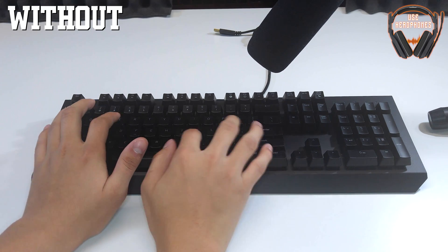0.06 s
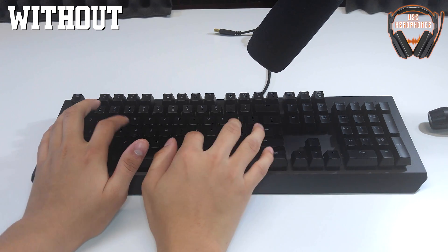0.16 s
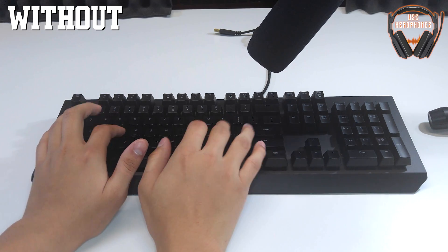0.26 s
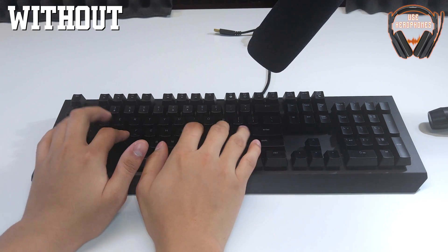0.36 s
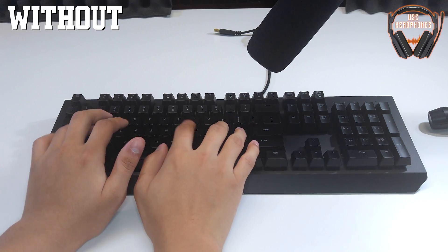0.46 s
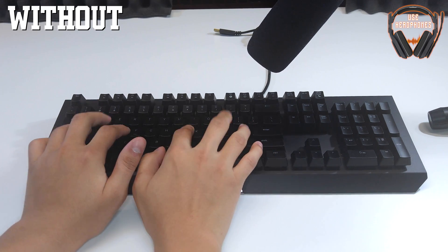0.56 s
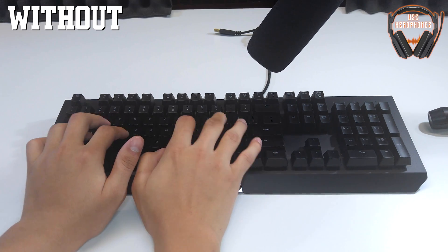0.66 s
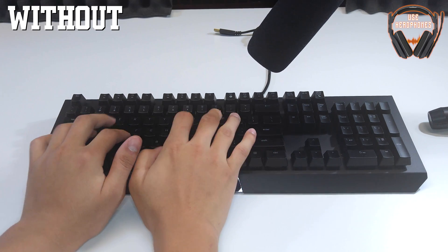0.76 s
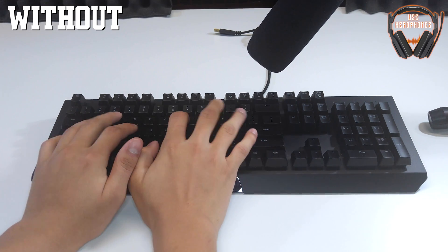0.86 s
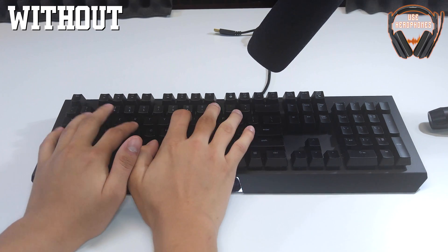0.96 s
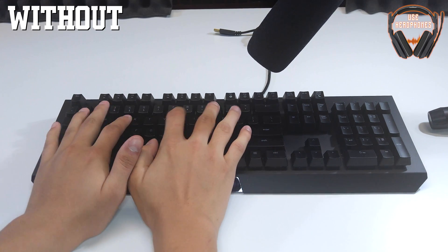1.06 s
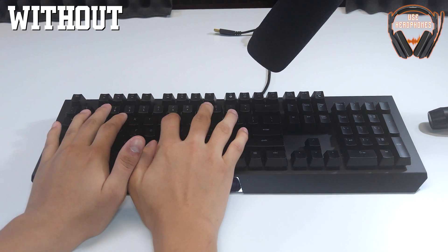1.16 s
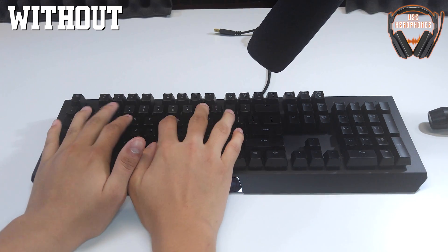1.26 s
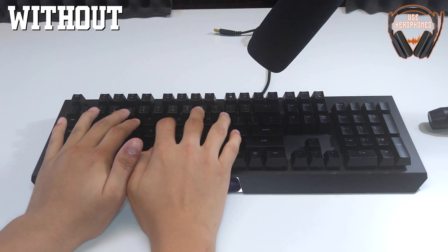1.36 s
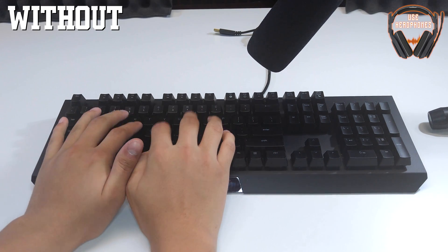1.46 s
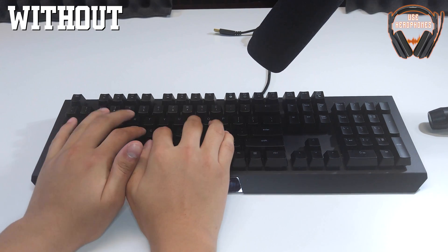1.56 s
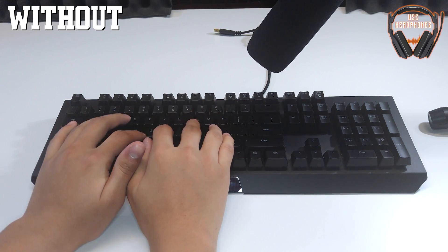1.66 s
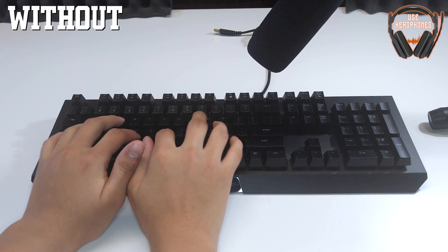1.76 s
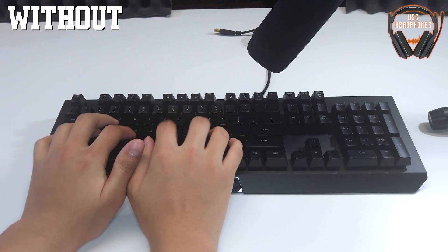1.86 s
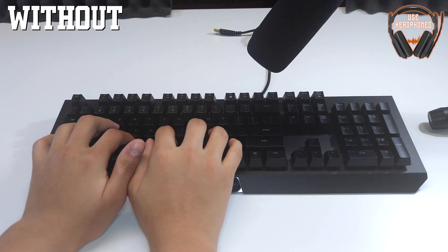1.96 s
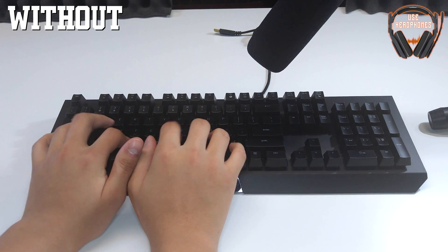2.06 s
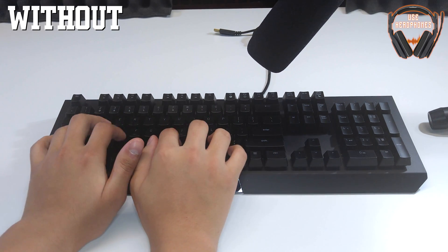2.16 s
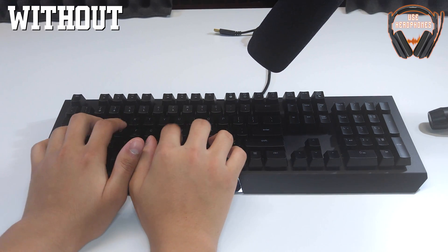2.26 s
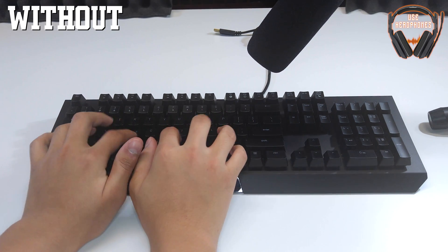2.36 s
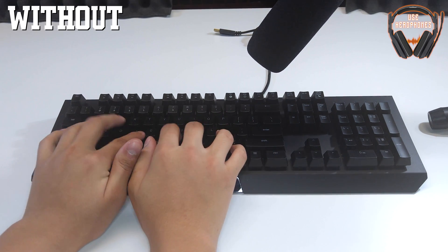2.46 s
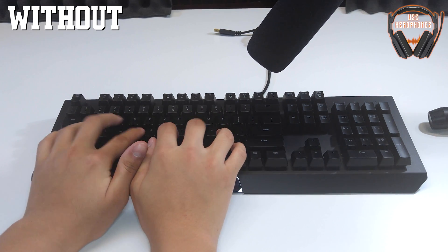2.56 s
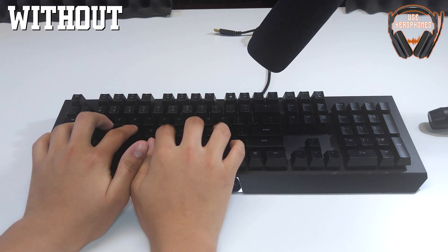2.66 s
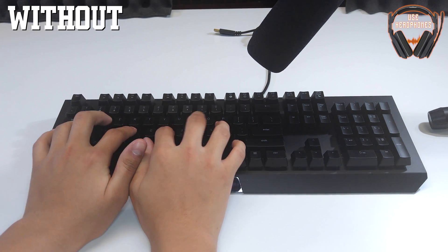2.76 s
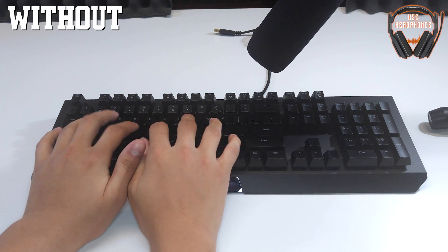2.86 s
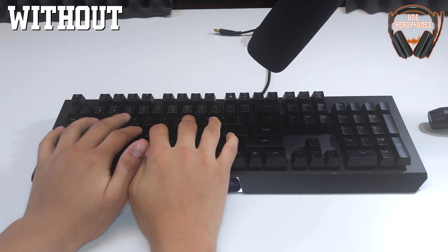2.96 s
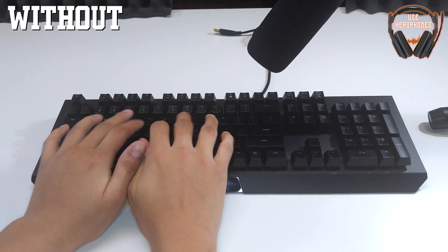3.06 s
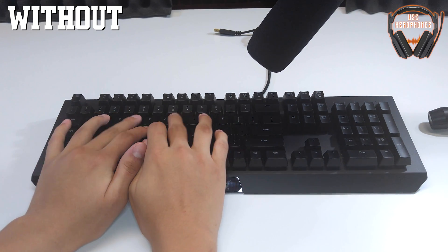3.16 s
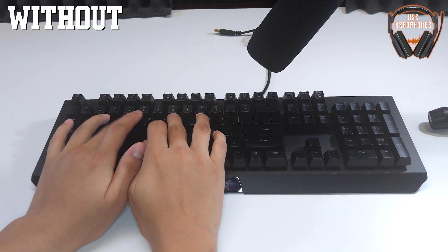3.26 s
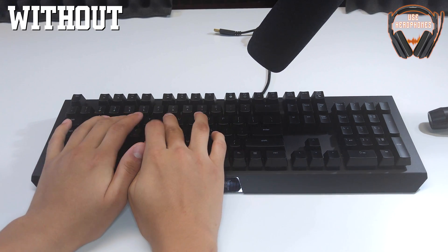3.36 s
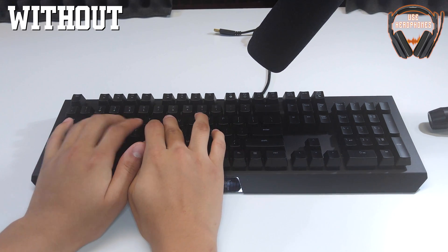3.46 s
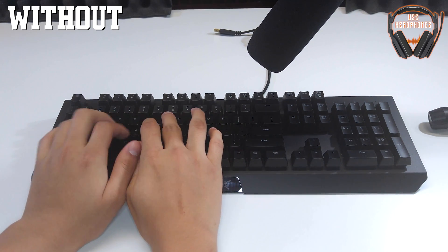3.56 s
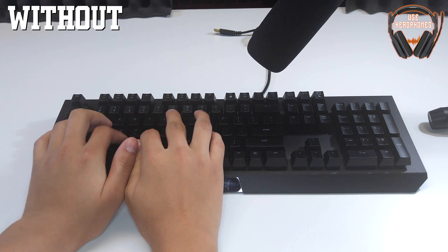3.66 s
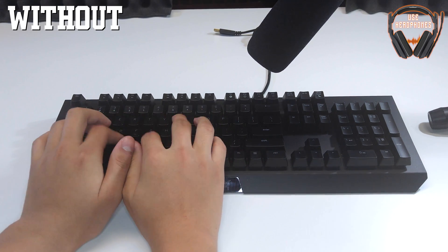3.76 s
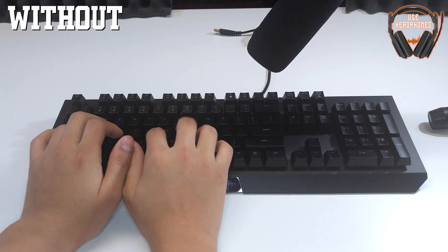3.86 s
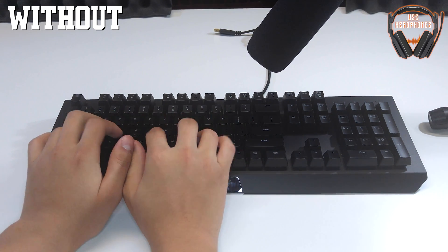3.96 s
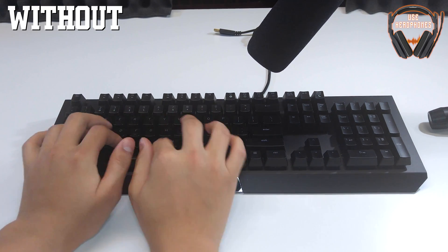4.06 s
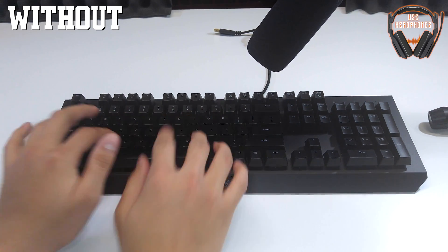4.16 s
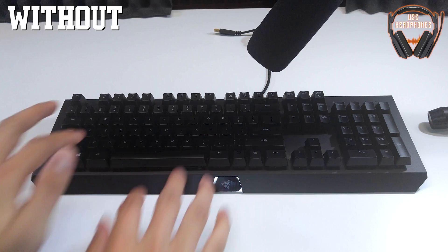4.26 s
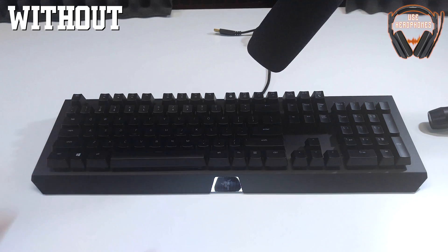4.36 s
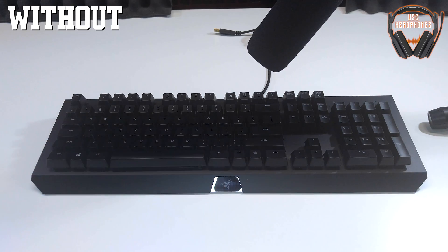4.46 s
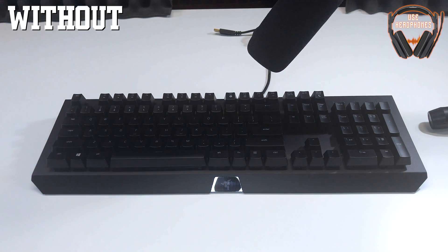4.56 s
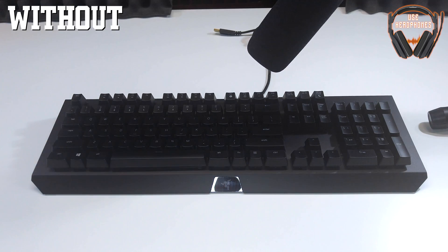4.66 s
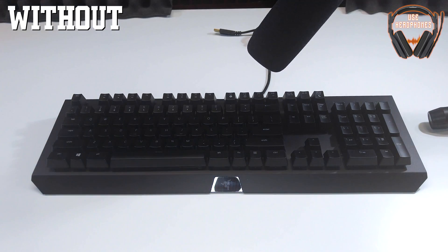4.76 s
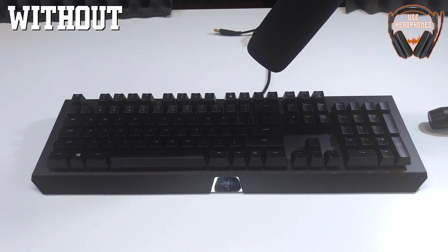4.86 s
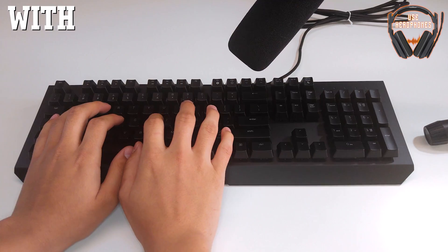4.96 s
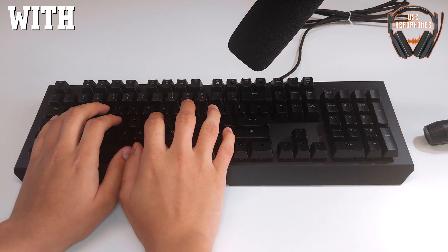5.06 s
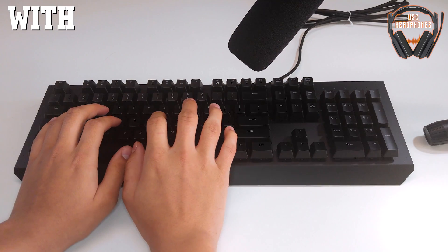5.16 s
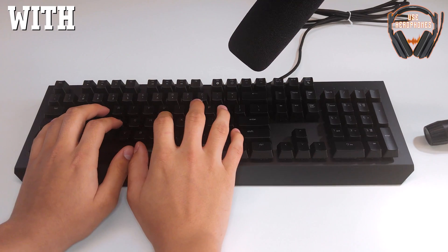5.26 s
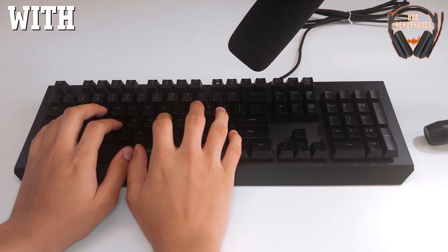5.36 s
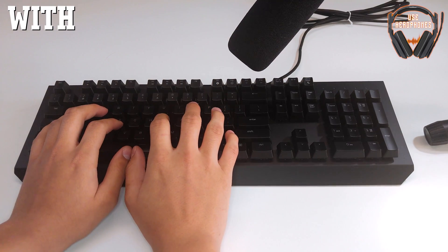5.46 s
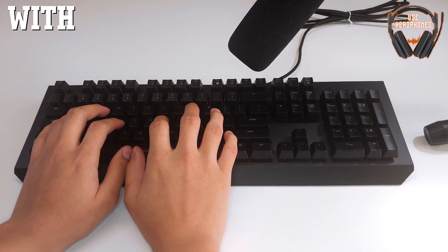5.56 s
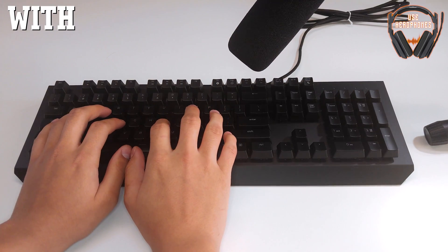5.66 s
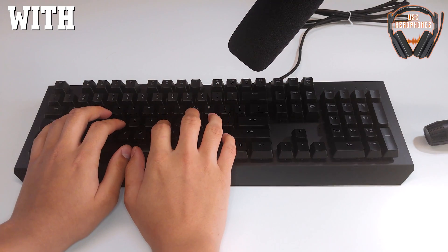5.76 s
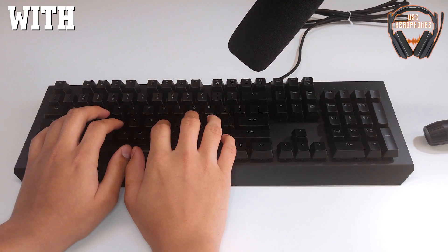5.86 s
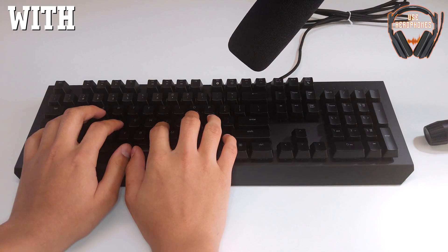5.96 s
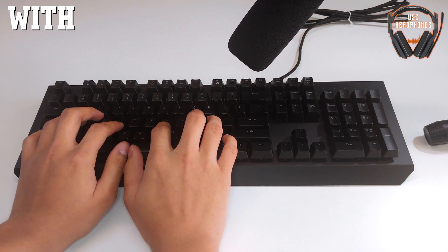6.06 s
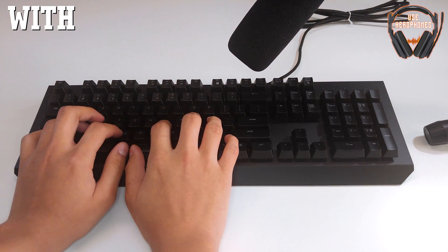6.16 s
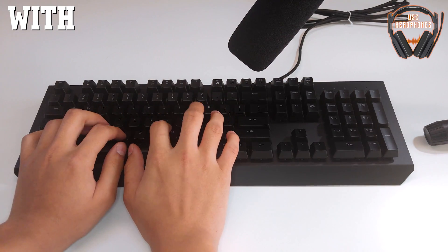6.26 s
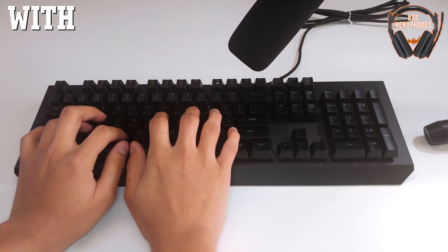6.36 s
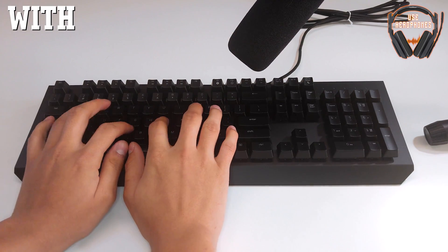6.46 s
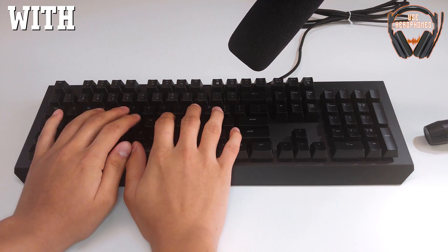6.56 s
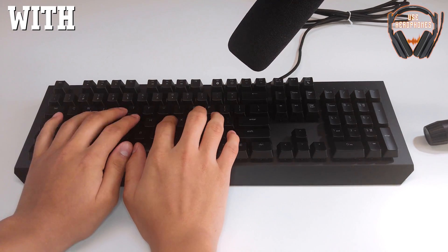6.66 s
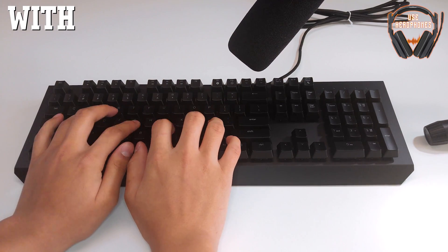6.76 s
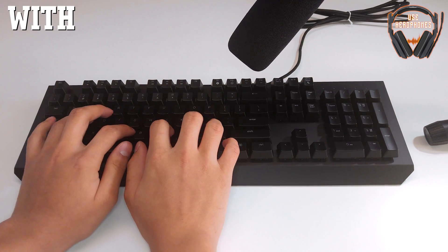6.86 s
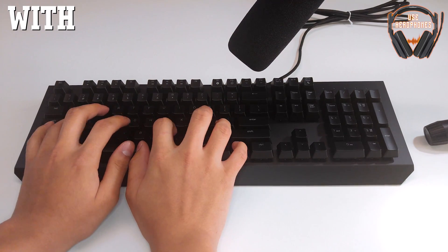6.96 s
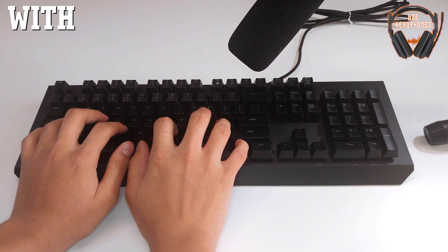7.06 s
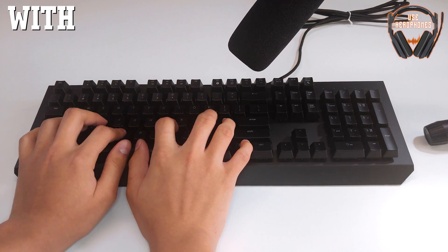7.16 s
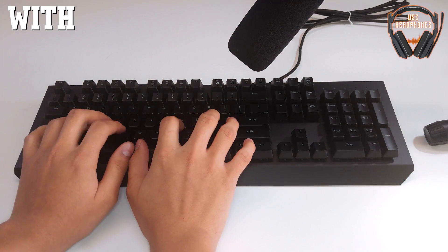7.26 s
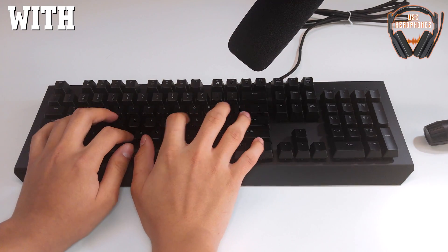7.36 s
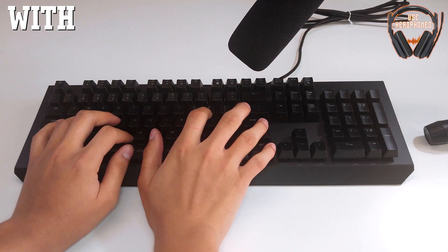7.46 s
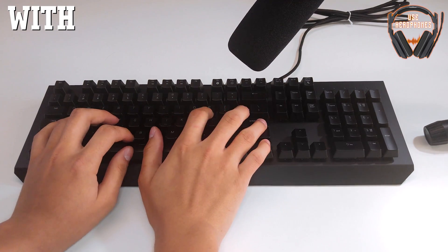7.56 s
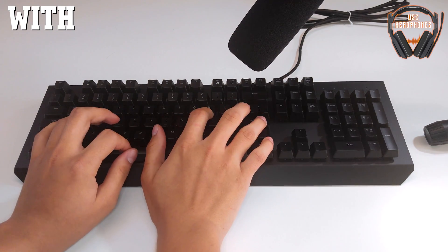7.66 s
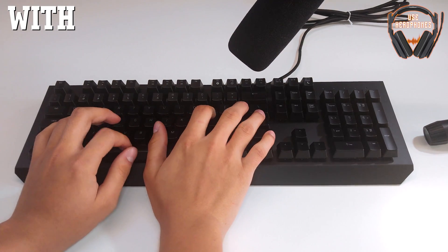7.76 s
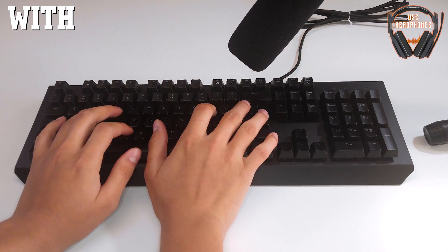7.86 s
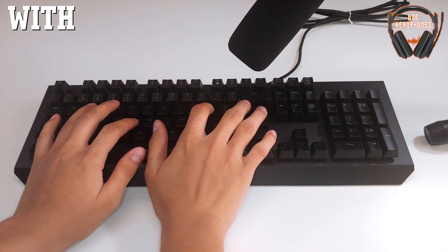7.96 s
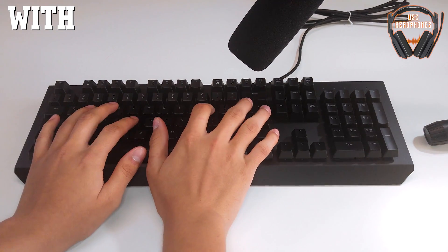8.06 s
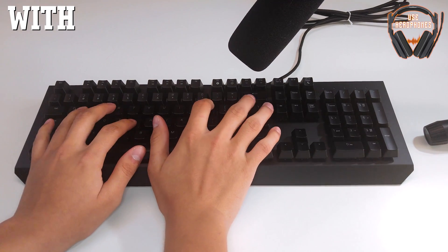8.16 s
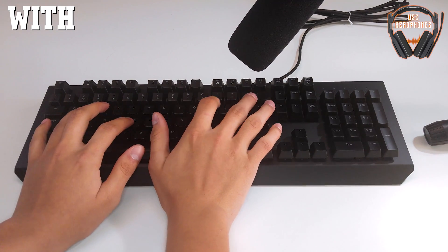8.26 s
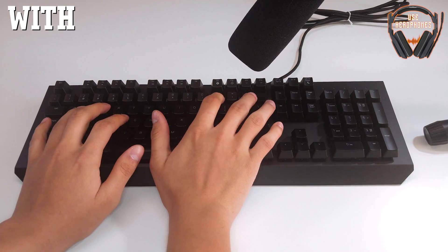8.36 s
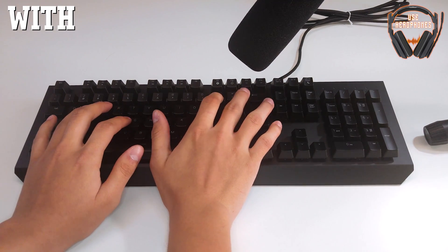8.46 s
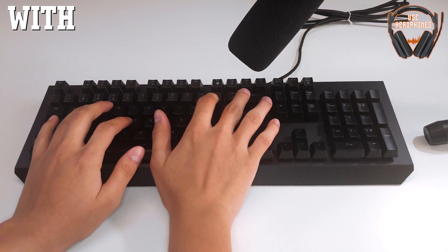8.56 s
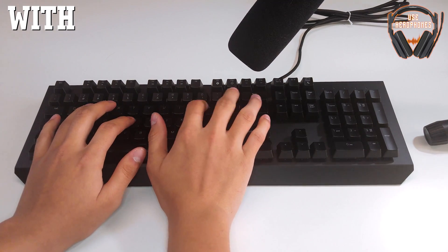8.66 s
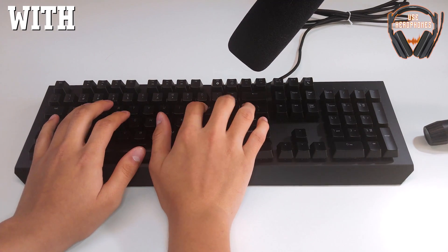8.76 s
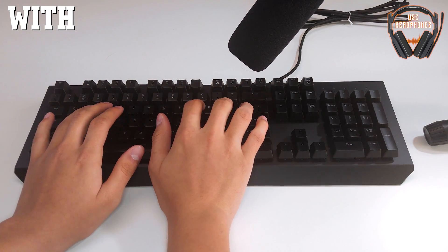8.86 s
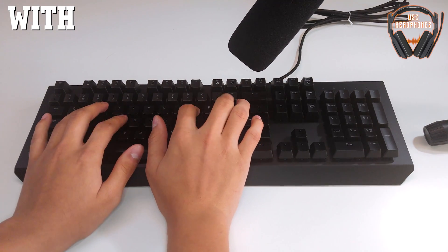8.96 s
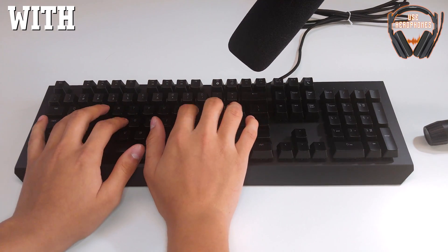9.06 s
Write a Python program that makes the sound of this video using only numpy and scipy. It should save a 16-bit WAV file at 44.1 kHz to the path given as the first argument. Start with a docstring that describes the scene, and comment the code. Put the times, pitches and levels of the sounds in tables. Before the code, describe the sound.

Rapid, uneven clicks and clacks from a mechanical keyboard fill a small quiet room, heard up close. Keycaps rattle a little and the desk rumbles faintly under the hands. About halfway through the keys fall silent, leaving only a very faint brush of a hand and light fingertip touches. Then the typing starts again, with a few heavier key thumps toward the end.

```python
"""Fast typing on a clicky keyboard

A mechanical keyboard is heard up close in a small quiet room, with a pause halfway.
Switches snap, keycaps clack on the plate, and the hollow case and the desk top answer:
each part rings at its own few pitches (its modes) when hit. Loose parts rattle,
fingers scrape, and the hands set the desk rocking at a very low pitch."""
import sys
import numpy as np
from scipy import signal
from scipy.io import wavfile
from scipy.ndimage import uniform_filter1d

SR = 44100
rng = np.random.default_rng(int(sys.argv[2]) if len(sys.argv) > 2 else 0)


def generate_wav(sig):
    """Save sig (samples, or channels by samples) to the path in sys.argv[1] as 16-bit PCM at SR."""
    pcm = np.round(np.clip(np.atleast_2d(sig).T, -1, 1) * 32767).astype(np.int16)
    wavfile.write(sys.argv[1], SR, pcm)


N = 401751
TIME_S = np.arange(N) / SR
KEY_DETUNE, SHARED_DETUNE = 0.08, 0.025   # pitch spread: keycaps differ more than case or desk
DULLING = 0.055   # soft hits are duller: dB lost per octave, per dB below the hardest hit


def from_db(db):
    """Turn decibels into a gain."""
    return 10 ** (np.asarray(db) / 20)


def unit_power(x):
    """Scale a sound to an average power of 1."""
    return x / np.sqrt(np.mean(x ** 2) + 1e-20)


def keep(x, hz, side):
    """Keep what lies on the "low" or "high" side of a pitch."""
    return signal.sosfilt(signal.butter(4, hz, side, fs=SR, output="sos"), x)


def wander(points):
    """A curve that drifts through this many random values."""
    return np.interp(TIME_S, np.linspace(0, N / SR, points), rng.standard_normal(points))


def ring(clicks, hz, ring_s):
    """Each click starts a pure tone that fades by 60 dB in ring_s."""
    decay, angle = from_db(-60 / (ring_s * SR)), 2 * np.pi * hz / SR
    return signal.lfilter([0, np.sin(angle)], [1, -2 * decay * np.cos(angle), decay ** 2], clicks + 1e-18)


def ringing_noise(modes, shorten):
    """Steady noise coloured by a part's modes, with their ring times shortened."""
    white = rng.standard_normal(N)
    return unit_power(sum((-1) ** k * from_db(db) * unit_power(ring(white, hz, ring_s * shorten))
                          for k, (hz, db, ring_s) in enumerate(modes)))


def strike(start_s, level_db, modes, spread_db, gap_s, bounce_db, hits, kinds,
           detune=SHARED_DETUNE, first_db=-4):
    """Each blow is a few quick bouncing hits, each shared out at random over the modes."""
    waits = rng.uniform(0.3, 1, (len(start_s), hits)) * gap_s
    waits[:, 0] = 0
    at = np.minimum(((start_s[:, None] + np.cumsum(waits, axis=1)) * SR).astype(int), N - 1)
    pitches, mode_db, _ = np.transpose(modes)
    tilt_db = DULLING * (level_db - level_db.max())[:, None, None] * np.log2(pitches / pitches[0])
    share = from_db(mode_db + tilt_db + spread_db * rng.standard_normal((*at.shape, len(modes))))
    share *= rng.choice([-1, 1], share.shape) / np.linalg.norm(share, axis=2, keepdims=True)
    hit_db = bounce_db * np.arange(hits) + first_db * (np.arange(hits) == 0)   # the first only grazes
    share *= from_db(level_db[:, None] + hit_db)[:, :, None]
    key_kind = rng.integers(0, kinds, len(start_s))   # each kind of key has its own tuning
    out = np.zeros(N)
    for kind, shift in enumerate(1 + detune * np.linspace(-1, 1, kinds) * (kinds > 1)):
        chosen = key_kind == kind
        for k, (hz, _, ring_s) in enumerate(modes):
            clicks = np.bincount(at[chosen].ravel(), share[chosen, :, k].ravel(), N)
            out += ring(clicks, hz * shift ** (-1) ** k, ring_s)   # neighbours shift opposite ways
    return out


def peaks_db(at_s, peak_s, level_db, swell_db_per_s, fade_db_per_s):
    """A level that swells up to each peak and fades after it; the loudest wins."""
    ahead_s = peak_s - at_s[:, None]
    return np.max(level_db - np.maximum(swell_db_per_s * ahead_s, -fade_db_per_s * ahead_s), axis=1)


def typing_db(at_s, swell_db_per_s, fade_db_per_s):
    """How loud the typing is around the given moments."""
    start_s, snap_db, clack_db, _ = np.transpose(KEY_HITS)
    return peaks_db(at_s, start_s, np.maximum(clack_db, snap_db - 7.5), swell_db_per_s, fade_db_per_s)


# The room's echo, band by band: pitch_hz, ring_s, level_db
ROOM_BANDS = [(462, 0.32, -23), (970, 0.26, -26), (2300, 0.47, -33), (4400, 0.05, -18.5), (4985, 0.23, -40),
              (7000, 0.021, -17.5), (13020, 0.036, -27)]


def room(sound):
    """Many reflections blur into a tail of noise that dies away band by band."""
    t = TIME_S[:SR // 2]
    tail = np.zeros(len(t))
    for hz, ring_s, db in ROOM_BANDS:
        band_filter = signal.butter(2, [hz / 1.4, hz * 1.4], "band", fs=SR, output="sos")
        band = signal.sosfilt(band_filter, rng.standard_normal(len(t)))
        band *= from_db(-60 * t / ring_s) * np.minimum(t / 0.004, 1)
        tail += from_db(db) * band / np.sqrt(np.sum(band ** 2))
    return signal.fftconvolve(sound, tail)[:N]


# Shoves of the hands that rock the desk: widest_swing_s, level_db
HAND_SHOVES = [(0.039, -37), (.34, -43.5), (.49, -35.5), (.81, -38), (.93, -44), (1.12, -45.5), (1.31, -46),
               (1.48, -42.5), (1.83, -44), (2.13, -37.5), (2.3, -41), (2.52, -40), (2.66, -38.5),
               (2.791, -38.5), (3.08, -40.5), (3.26, -38), (3.4, -44.5), (3.65, -39.5), (3.817, -34),
               (4.06, -44), (4.218, -49.5), (5.01, -54), (5.075, -51), (5.42, -56.5), (5.7, -41),
               (5.94, -34.5), (6.15, -36.5), (6.28, -40), (6.539, -37), (6.73, -42.5), (6.898, -45),
               (7.0, -39), (7.159, -37.5), (7.5, -42), (7.71, -37.5), (8.09, -44), (8.42, -40.5),
               (8.767, -37), (8.969, -36.5), (9.1, -44)]


def desk_sway(pitch_hz=28.2, silent_from_s=4.44, silent_until_s=4.96):
    """The desk rocks at a low, drifting pitch with a rumble on top; both drop out in the pause."""
    steps_s = TIME_S[::256]
    shove_db = peaks_db(steps_s, *np.transpose(HAND_SHOVES), swell_db_per_s=213.5, fade_db_per_s=128)
    level_db = np.maximum(shove_db, typing_db(steps_s, 400, 60) - 16)   # typing keeps it moving
    level_db = uniform_filter1d(np.interp(TIME_S, steps_s, level_db), size=1200)
    phase = 2 * np.pi * np.cumsum(pitch_hz * (1 + 0.057 * wander(140))) / SR
    uneven = 1 + 0.4 * wander(220)
    rocking = np.sqrt(2) * from_db(level_db) * uneven * np.sin(phase)
    rumble = keep(ringing_noise(DESK_MODES[:4], shorten=0.6), 200, "low")
    rumble_db = -22 + 0.87 * uniform_filter1d(level_db, size=1000) + wander(N // 3000)
    sounding = (TIME_S < silent_from_s) | (TIME_S > silent_until_s)
    return uniform_filter1d(1.0 * sounding, size=600) * (rocking + from_db(rumble_db) * rumble)


# Fingertips settling on the keys before typing resumes: start_s, pitch_hz, level_db
FINGER_TOUCHES = [(5.253, 1494, -77.5), (5.294, 2480, -74.5), (5.427, 1370, -63.5), (5.43, 2590, -70),
                  (5.505, 2520, -72)]


def finger_touches(slide_s=0.0096):
    """Each light touch is a short scratchy slide that rings one note of a keycap."""
    out, white = np.zeros(N), rng.standard_normal(N)
    for start_s, hz, level_db in FINGER_TOUCHES:
        fade = (TIME_S > start_s) * np.exp(-np.abs(TIME_S - start_s) / slide_s)
        slide = white * fade * np.sqrt(2 / (slide_s * SR))
        out += ring(from_db(level_db) * slide, hz, ring_s=0.028)
    return keep(out, 1000, "high")


def hand_brush(plastic_noise, start_s=4.482, level_db=-68.5, fade_db_per_s=390):
    """A hand brushes the desk once during the pause."""
    since_s = TIME_S - start_s
    gain = from_db(level_db - fade_db_per_s * np.abs(since_s)) * np.clip(since_s / 0.0049, 0, 1)
    return gain * (plastic_noise + from_db(-1.5) * ringing_noise(DESK_MODES[3:], shorten=0.7))


def friction():
    """Fingers and key stems scrape, springs sizzle, long keys rub their wires, a hand brushes by."""
    steps_s = TIME_S[::128]
    flicker_db = 8.5 * unit_power(uniform_filter1d(rng.standard_normal(len(steps_s)), size=2))

    def gain(level_db, flicker):
        """A loudness curve made uneven by the flicker."""
        return from_db(np.interp(TIME_S, steps_s, level_db + flicker * flicker_db))

    bright = keep(ringing_noise(SWITCH_MODES, shorten=0.17), 11500, "low")
    plastic = ringing_noise(KEYCAP_MODES, shorten=0.47)
    plastic += from_db(-7) * ringing_noise(CASE_MODES, shorten=0.6)
    dull = keep(plastic, 660, "high")
    scratch = unit_power(keep(keep(rng.standard_normal(N), 3000, "high"), 7000, "low"))
    scrape = gain(typing_db(steps_s, 470, 390) - 27.5, 1) * (dull + from_db(-8) * bright)
    sizzle = gain(typing_db(steps_s, 2000, 120) - 58, 0.85) * (bright + dull + from_db(3.5) * scratch)
    rub = gain(peaks_db(steps_s, *np.transpose(HEAVY_BLOWS), 380, 270) - 24, 0.5) * scratch
    return scrape + sizzle + rub + hand_brush(plastic)


def rattle(ticks_per_s=430):
    """Loose keycaps and stems tick at random, louder close to a hard key hit."""
    moment, strength, chance = rng.random((4000, 3)).T
    chosen = chance < ticks_per_s * N / SR / len(chance)
    start_s = moment[chosen] * N / SR
    extra_db = 5.6 * np.minimum(-np.log(1 - strength[chosen]), 2.5)   # a few ticks stand out
    level_db = typing_db(start_s, 800, 240) - 31.5 + extra_db
    caps = strike(start_s, level_db, KEYCAP_MODES + CASE_MODES[2:],
                  spread_db=18, gap_s=0.0043, bounce_db=-2.3, hits=2, kinds=3, detune=KEY_DETUNE)
    stems = strike(start_s, level_db - 19.5 + rng.normal(0, 9.7, len(start_s)), SWITCH_MODES[:6],
                   spread_db=8.2, gap_s=0.00048, bounce_db=-2.8, hits=3, kinds=2)
    return keep(caps, 720, "high") + stems


# Heavy blows of long keys and wrists: start_s, level_db
HEAVY_BLOWS = [(0.153, -55), (0.651, -49), (2.243, -52), (5.402, -81), (6.148, -51), (7.304, -43),
               (7.457, -36.5), (7.466, -42), (7.491, -60), (8.144, -46), (8.262, -49.5)]


def thumps():
    """A soft burst of hits shakes the desk top; resting wrists shorten its ring."""
    damped = [(hz, db, ring_s * 0.81) for hz, db, ring_s in DESK_MODES[2:]]
    thuds = strike(*np.transpose(HEAVY_BLOWS), damped,
                   spread_db=2.5, gap_s=0.0053, bounce_db=-1.9, hits=9, kinds=1)
    return keep(thuds, 480, "low")


# How the desk top rings: pitch_hz, level_db, ring_s
DESK_MODES = [(60.04, -0.5, 0.13), (89.7, -2.5, 0.19), (115.5, -7.5, 0.12), (174.6, -8.5, 0.17),
              (245, -7.5, 0.11), (278, -12, 0.097), (357, -12.5, 0.1), (420.6, -2, 0.043)]


def desk_knock(start_s, thock_db):
    """Each hit reaches the desk through rubber feet, which soften it."""
    knock = strike(start_s, thock_db - 15.5 + rng.normal(0, 2.4, len(start_s)), DESK_MODES,
                   spread_db=6.2, gap_s=0.00812, bounce_db=-1.7, hits=2, kinds=2)
    return keep(knock, 780, "low")


# How the springs ring, alike for all keys: pitch_hz, level_db, ring_s
SPRING_MODES = [(8540, -44, .16), (1365, -43, .6), (2480, -41, 0.7)]


def spring_ping(start_s, level_db):
    """Each hit leaves the springs ringing faintly."""
    blows = np.bincount((start_s * SR).astype(int), from_db(level_db) * rng.choice([-1, 1], len(start_s)), N)
    return sum(from_db(db) * ring(blows, hz, ring_s) for hz, db, ring_s in SPRING_MODES)


# How the hollow case rings: pitch_hz, level_db, ring_s
CASE_MODES = [(744, -3.5, 0.04), (780, 0.5, 0.023), (852, 3.5, 0.025), (904, -9, 0.017), (1028, -6, 0.028),
              (1140, -2.5, 0.011), (1208, -5, 0.023), (1387, -13.5, 0.03)]


def case_thock(start_s, level_db):
    """The case answers just after each hit with a round, hollow knock."""
    thock = strike(start_s + 0.001194, level_db - 4, CASE_MODES,
                   spread_db=10, gap_s=0.0025, bounce_db=-1.6, hits=6, kinds=3)
    return keep(thock, 1900, "low")


# How a keycap rings: pitch_hz, level_db, ring_s
KEYCAP_MODES = [(2082, -8, 0.03), (2276, -2, 0.022), (2413, 9, 0.017), (2620, -6.5, 0.037),
                (3106, 2, 0.014), (3292, -6.5, 0.014), (4240, -16, 0.014)]


def keycap_clack(start_s, level_db):
    """The keycap lands on the plate; soft plastic rounds off the treble."""
    clack = strike(start_s, level_db + 3.5, KEYCAP_MODES, spread_db=6.1, gap_s=0.001299,
                   bounce_db=-4, hits=4, kinds=4, detune=KEY_DETUNE, first_db=-2.5)
    return keep(clack, 5200, "low")


# How a switch rings: pitch_hz, level_db, ring_s
SWITCH_MODES = [(4183, -5, 0.0065), (5160, -5.5, 0.0034), (6670, -3, 0.003), (8336, 1, 0.0052),
                (9130, -1.5, 0.0042), (9910, -5.5, 0.0083), (11330, -1, 0.0042), (12140, -5, 0.0084),
                (13500, -5.5, .006), (15400, -14.5, .005)]


def switch_snap(start_s, level_db, chatter_s=0.011):
    """The springy leaf inside the switch snaps, then ticks on faintly."""
    snap = strike(start_s, level_db + 3, SWITCH_MODES, spread_db=4.2, gap_s=0.0004,
                  bounce_db=-3.5, hits=5, kinds=3, detune=0.038, first_db=-0.2)
    chatter = strike(start_s + chatter_s, level_db - 24.5, SWITCH_MODES[2:6],
                     spread_db=5, gap_s=chatter_s, bounce_db=-2.5, hits=6, kinds=1)
    return snap + chatter


# Key hits and how hard they drive switch, keycap and case: start_s, snap_db, clack_db, thock_db
KEY_HITS = [(0.064, -35.5, -39, -46), (0.0843, -77, -49, -52), (0.12, -62, -36.5, -37.5),
            (0.1242, -62, -45, -44), (0.1483, -42, -32.5, -29.5), (0.171, -32.5, -47, -63),
            (0.179, -43, -28, -42), (0.291, -38, -38.5, -54), (0.295, -31.5, -38.5, -53),
            (0.3322, -49, -29.5, -30), (0.3712, -30, -38, -64), (0.378, -43, -34, -42),
            (0.397, -34.5, -44, -65), (0.405, -62, -29, -37.5), (0.4567, -54, -30.5, -34),
            (0.4632, -52, -43, -45), (0.4861, -36.5, -39, -38), (0.496, -34.5, -38.5, -40.5),
            (0.5387, -31.5, -48, -44), (0.548, -57, -43, -47), (0.576, -51, -33, -31),
            (0.5845, -63, -44, -41), (0.6222, -68, -38, -39), (0.72, -64, -47, -41.5),
            (0.7481, -47.5, -27.5, -28.5), (0.8322, -60, -42, -53), (0.842, -32.5, -46, -72),
            (0.8533, -62, -33, -40.5), (1.002, -48, -36.5, -33.5), (1.0257, -38, -39, -41),
            (1.034, -47, -32.5, -42), (1.107, -82, -50, -41), (1.1762, -42, -40, -32),
            (1.19, -55, -42, -41.5), (1.228, -68, -48, -41), (1.2591, -78, -43.5, -40.5),
            (1.2854, -37.5, -40, -62), (1.297, -61, -38, -40.5), (1.3832, -62, -44, -42),
            (1.4119, -43.5, -33, -34.5), (1.427, -40.5, -38, -60), (1.515, -74, -48.5, -55),
            (1.5383, -38.5, -34.5, -46), (1.5456, -56, -40, -37.5), (1.5567, -38, -32, -61),
            (1.5639, -49, -32, -38), (1.618, -62, -53, -50), (1.643, -47.5, -40.5, -37),
            (1.6681, -45.5, -36.5, -36.5), (1.7173, -63, -43, -41), (1.7201, -77, -44, -38),
            (1.746, -74, -50.5, -44), (1.8068, -67, -42, -49), (1.8166, -42, -38, -50),
            (1.8306, -86, -41.5, -43), (1.8647, -37, -42.5, -68), (1.879, -70, -37.5, -45),
            (1.9628, -62, -44.5, -39.5), (1.9796, -54, -39.5, -37), (2.02, -68, -52, -51),
            (2.049, -55, -52, -55), (2.0604, -41, -39, -71), (2.068, -35, -38, -38),
            (2.0752, -42, -34, -55), (2.095, -65, -45, -42), (2.116, -32.5, -39, -68),
            (2.132, -70, -40, -47), (2.191, -50.5, -61, -58), (2.1954, -56, -37.5, -37.5),
            (2.235, -59, -56, -60), (2.2448, -46, -33.5, -32.5), (2.282, -40, -42, -61),
            (2.29, -39.5, -33.5, -44.5), (2.312, -54, -42, -38.5), (2.354, -36, -37, -66),
            (2.373, -37.5, -50, -61), (2.38, -59, -29.5, -40), (2.411, -52, -42, -43),
            (2.467, -61, -45.5, -37.5), (2.485, -31, -39, -40), (2.4953, -66, -30, -35),
            (2.532, -53, -48, -41), (2.576, -36.5, -43, -40), (2.5829, -55, -36.5, -39.5),
            (2.5988, -39.5, -35, -52), (2.6048, -43, -33, -36), (2.627, -74, -50, -52),
            (2.6828, -46.5, -37, -35), (2.72, -55, -42, -39), (2.729, -48, -36.5, -39),
            (2.74, -54, -39, -34.5), (2.8197, -35.5, -40, -59), (2.832, -51, -35, -48),
            (2.8872, -39, -42, -63), (2.8992, -39, -32, -47), (2.942, -48, -39, -37),
            (2.965, -54, -41, -38), (2.9804, -49, -39.5, -36.5), (3.053, -33, -39.5, -73),
            (3.0612, -49, -46, -39), (3.076, -34.5, -32.5, -55), (3.159, -51, -42.5, -52),
            (3.178, -52, -38, -31.5), (3.274, -34.5, -44, -61), (3.2857, -56, -37, -40),
            (3.36, -38, -42.5, -58), (3.366, -39, -30.5, -66), (3.3691, -48, -33, -37),
            (3.4656, -47, -36, -31), (3.479, -69, -34, -35.5), (3.564, -67, -44, -47),
            (3.5964, -36.5, -40.5, -45), (3.609, -69, -41, -43), (3.695, -37, -32.5, -31),
            (3.7564, -58, -39, -66), (3.7705, -54, -43, -43), (3.786, -55, -39, -43),
            (3.8077, -33.5, -37, -64), (3.822, -30, -39.5, -54), (3.8294, -49, -30.5, -35),
            (3.859, -79, -42.5, -47), (3.921, -48, -32, -33.5), (3.9305, -52, -37.5, -35.5),
            (3.976, -57, -50, -39.5), (3.992, -52, -40, -37.5), (4.028, -60, -46, -39),
            (4.0328, -81, -42.5, -37.5), (5.538, -87.5, -54, -52), (5.623, -77, -49.5, -70),
            (5.6404, -38, -38.5, -74), (5.6496, -36.5, -41, -51), (5.666, -53, -37, -40.5),
            (5.76, -71, -51, -41.5), (5.772, -36.5, -46, -54), (5.795, -31, -30, -36),
            (5.8583, -32, -44, -60), (5.881, -57, -34, -56), (5.884, -43, -32, -30),
            (5.929, -73, -48.5, -41), (5.974, -58, -51, -59), (6.002, -44, -38.5, -35.5),
            (6.0098, -31.5, -36, -59), (6.081, -64, -48, -53.5), (6.098, -36, -41, -68),
            (6.1359, -49.5, -33, -42.5), (6.172, -72, -52, -51), (6.206, -31.5, -35, -52),
            (6.2158, -53, -29.5, -30.5), (6.272, -33.5, -46.5, -62), (6.305, -33.5, -40.5, -44),
            (6.322, -43, -33.5, -39), (6.3363, -72, -42, -37.5), (6.388, -60, -50.5, -49),
            (6.4248, -51.5, -46, -35.5), (6.44, -51, -38, -31), (6.4598, -37.5, -41.5, -61),
            (6.4828, -59, -43, -40.5), (6.5637, -38.5, -35.5, -41), (6.584, -60, -40, -34.5),
            (6.6219, -32.5, -44.5, -48), (6.7288, -29.5, -42, -67), (6.7735, -30.5, -42, -40),
            (6.789, -35, -30, -30), (6.8478, -31, -47, -48), (6.8558, -91, -40, -33),
            (6.861, -50, -36, -64), (6.904, -54, -48, -53), (6.916, -45.5, -35, -29.5),
            (6.9315, -64, -44, -48), (6.9386, -34.5, -45, -39.5), (6.958, -44, -38, -32.5),
            (6.9807, -57, -41, -38), (6.996, -37, -42, -68), (7.0196, -52, -35.5, -34.5),
            (7.088, -66, -51, -48.5), (7.13, -47, -36, -61), (7.175, -26.5, -44, -69),
            (7.2004, -55, -38.5, -34), (7.283, -64, -47, -42), (7.297, -29.5, -48, -44),
            (7.341, -52, -54, -51), (7.38, -47, -41, -40.5), (7.449, -48, -53, -43),
            (7.4581, -43, -35.5, -30), (7.4647, -55, -42, -35), (7.5102, -61, -43.5, -69),
            (7.533, -53, -64, -63), (7.5436, -26.5, -55, -51), (7.551, -24.5, -43, -54),
            (7.627, -49, -56, -48.5), (7.649, -27, -39, -29), (7.654, -43, -32.5, -49),
            (7.719, -74, -55, -50), (7.7525, -51, -46, -47), (7.771, -49, -42, -39),
            (7.8008, -32, -35.5, -41), (7.878, -70, -45.5, -40.5), (7.914, -61, -61, -62),
            (7.923, -51, -45.5, -45), (7.938, -54, -41, -36.5), (7.945, -27.5, -40.5, -53),
            (8.001, -55, -42, -37.5), (8.0647, -48, -53, -79), (8.0811, -50, -34, -35.5),
            (8.1388, -29, -36.5, -55), (8.244, -56, -72, -75), (8.2614, -41.5, -32, -31),
            (8.331, -64, -60, -53), (8.447, -40, -47.5, -55.5), (8.452, -28, -46, -49),
            (8.477, -49.5, -42, -40.5), (8.613, -37, -34, -32.5), (8.6267, -31, -39.5, -65),
            (8.6579, -37, -43, -74), (8.702, -33.5, -39, -45.5), (8.7338, -49, -35, -41),
            (8.7451, -43.5, -35.5, -36), (8.825, -50.5, -40, -36.5), (8.8693, -72, -41, -42),
            (8.8865, -50, -45, -36.5), (8.9253, -42, -35, -29), (8.9303, -28, -60, -50),
            (8.95, -38, -27.5, -32), (9.0044, -36, -50, -55), (9.0113, -37.5, -41, -62),
            (9.021, -49, -35.5, -40.5), (9.048, -35, -42, -49), (9.0923, -43, -29, -31)]


def typing():
    """Every key hit sounds the switch, keycap, springs, case and desk."""
    start_s, snap_db, clack_db, thock_db = np.transpose(KEY_HITS)
    keyboard = switch_snap(start_s, snap_db) + keycap_clack(start_s, clack_db)
    keyboard += spring_ping(start_s, np.maximum(clack_db, snap_db))
    keyboard += case_thock(start_s, thock_db)
    keyboard = keep(keyboard, 748, "high")   # too small to give off bass
    return keyboard + desk_knock(start_s, thock_db)


def scene():
    """The keyboard, its echo, the swaying desk and a faint hiss, in one channel."""
    direct = typing() + rattle() + friction() + finger_touches() + thumps()
    hiss = from_db(-106) * rng.standard_normal(N)
    return (direct + room(direct) + desk_sway() + hiss)[None, :]


def record(dry):
    """Cut away the very highest treble."""
    return signal.sosfilt(signal.cheby2(12, 70, 17500, fs=SR, output="sos"), dry)


dry = scene()
out = record(dry)
generate_wav(out)
```